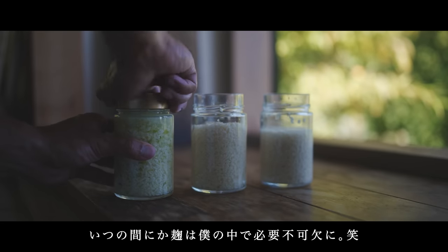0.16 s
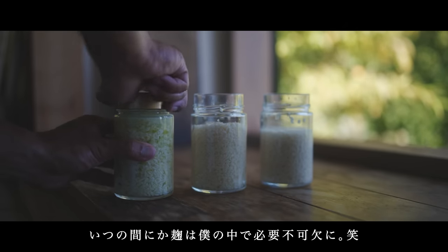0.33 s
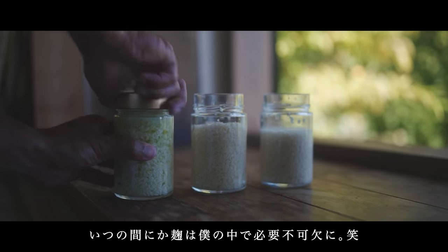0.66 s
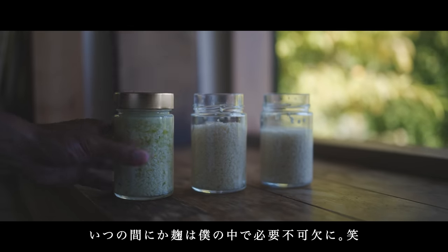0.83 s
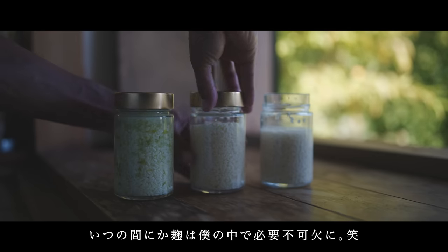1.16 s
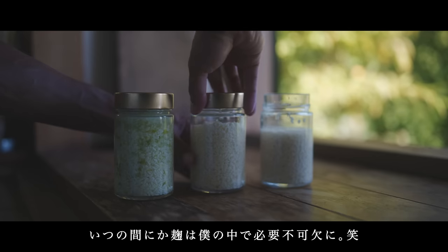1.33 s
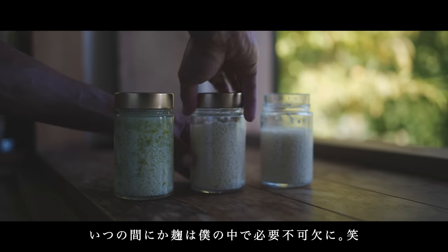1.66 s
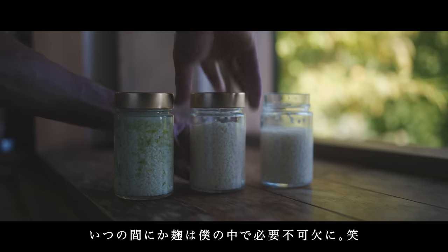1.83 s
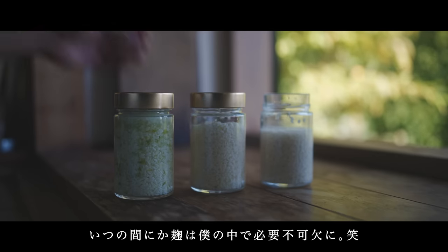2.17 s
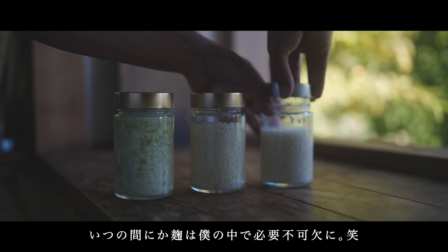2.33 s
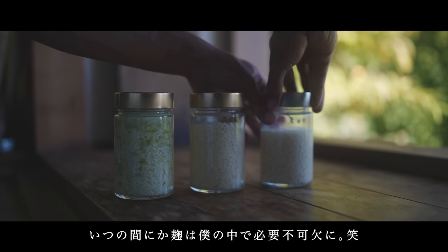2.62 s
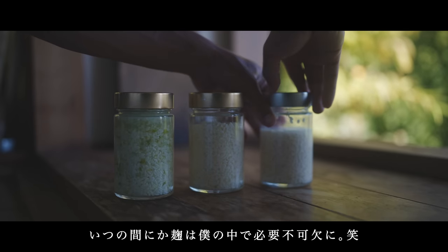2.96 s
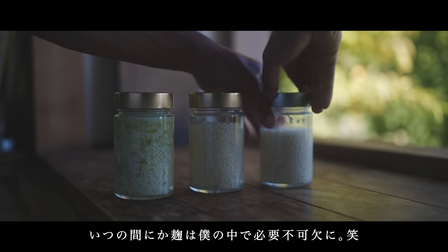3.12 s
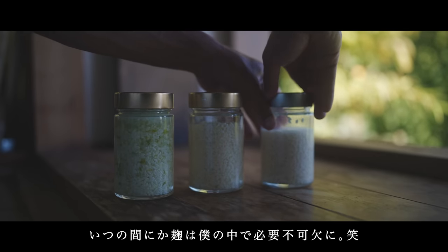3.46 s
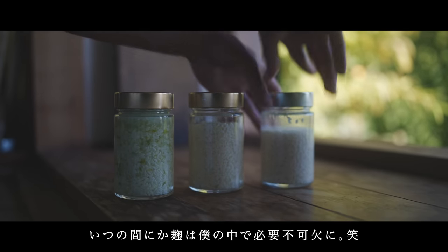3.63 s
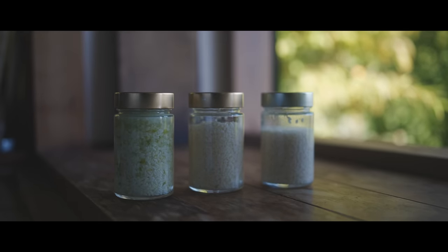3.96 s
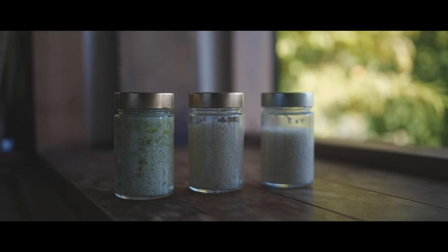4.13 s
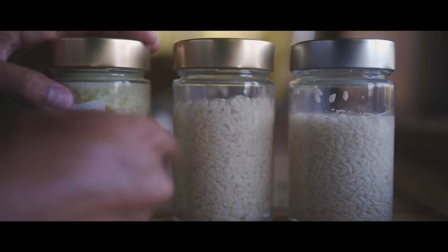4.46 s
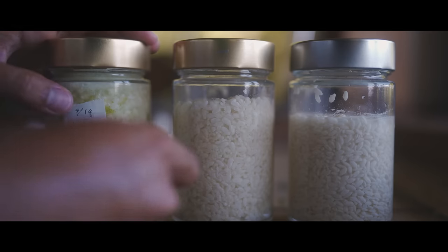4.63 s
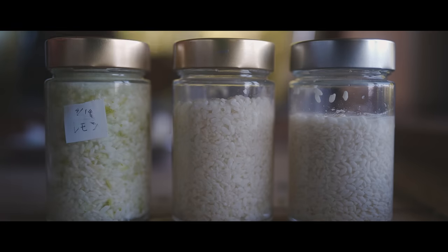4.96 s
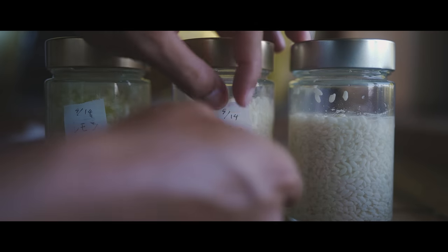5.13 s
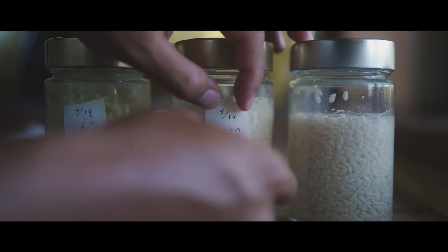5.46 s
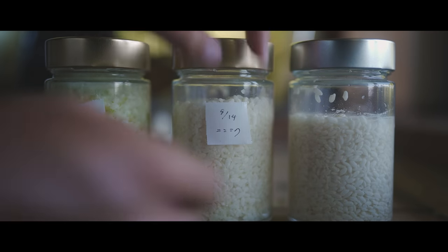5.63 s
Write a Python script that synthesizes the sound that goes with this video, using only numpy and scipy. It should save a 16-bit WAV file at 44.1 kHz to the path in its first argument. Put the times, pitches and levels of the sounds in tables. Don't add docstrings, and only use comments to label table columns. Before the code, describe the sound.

A close, dry sound of jars handled on a wooden table beside an open window, with quiet low rumble, soft hiss and small insect chirps behind. At about 0.4 s a lid and jar give a muted knock. From 0.95 to 1.3 s a metal lid lands on glass in a loud cluster of clacks, hollow drumming and bright ringing, then turns with light scrapes until about 1.9 s. At 2.3 to 2.7 s the last lid clatters on and tightens with coarse thread bites and wooden thumps. Softer settling taps follow at 2.9 to 3.6 s, and a low slide on wood near 3.9 s. A far chime tinkles faintly at 3.8, 4.2, 4.8 and 5.1 s. Around 4.5 s sticky label glue snaps sharply, followed by papery finger rubs to 4.8 s, a small tick at 4.9 s, and soft last strokes near 5.6 s.

```python
import sys
import numpy as np
from scipy import signal
from scipy.fft import rfft, irfft, next_fast_len
from scipy.io import wavfile
from scipy.ndimage import uniform_filter1d, map_coordinates

SR = 44100
rng = np.random.default_rng(int(sys.argv[2]) if len(sys.argv) > 2 else 0)


def undo_db(level):
    steps = np.asarray(level, float) / 20
    return 10 ** steps


def transcribe(signal):
    frames = np.atleast_2d(signal).T
    limited = np.clip(frames, -1, 1)
    pcm = np.round(limited * 32767).astype(np.int16)
    wavfile.write(sys.argv[1], SR, pcm)


N = 255339


def unit(x):
    return x / np.sqrt(np.mean(x ** 2) + 1e-20)


def along(points, hz):
    f, value = np.transpose(points)
    return np.interp(np.log(hz + 1), np.log(f + 1), value)


def level_curve(points):
    s, db = np.transpose(points)
    gain = undo_db(np.interp(np.arange(N) / SR, s, db, -140, -140))
    return uniform_filter1d(gain, size=200)


def wobble(rate):
    knots = rng.standard_normal(int(N * rate / SR) + 4)
    return map_coordinates(knots, [np.arange(N) * rate / SR])


def swell(start, peak, end):
    out = np.zeros(N)
    a, b = int(start * SR), int((max(end, peak, start) + .01) * SR)
    times = [start, max(peak, start + .002), max(end, peak + .004)]
    shape = np.interp(np.arange(a, min(b, N)) / SR, times, [0, 1, 0])
    out[a:b] = np.sin(np.pi / 2 * shape) ** 2
    return out


def add_at(out, s, sound):
    start = round(s * SR)
    out[..., start:start + sound.shape[-1]] += sound


def filtered(x, response):
    m = next_fast_len(len(x) + SR // 2)
    return irfft(rfft(x, m) * response(np.fft.rfftfreq(m, 1 / SR)), m)[:len(x)]


def banded(x, order, edges, kind):
    return signal.sosfilt(signal.butter(order, edges, kind, fs=SR, output="sos"), x)


def noise(spectrum):
    return unit(filtered(rng.standard_normal(N), lambda hz: undo_db(along(spectrum, hz))))


def grit(sharp_db):
    return rng.standard_normal(N) * undo_db(sharp_db * (wobble(400) + .8 * wobble(60)))


def body(modes):
    def response(f):
        total = 0
        for k, (centre, width, db) in enumerate(modes):
            loss = 1j * f * width
            total = total + (-1) ** k * undo_db(db) * loss / (centre ** 2 - f * f + loss)
        return total
    return response


def held(modes, blur):
    return body([(hz, blur / t60, db) for hz, db, t60 in modes])


def ring(modes, centre_hz, spread, scatter_db, attack, damp, rough, t):
    hz, db, t60 = np.transpose(modes)[:, :, None]
    luck = rng.standard_normal((3, len(modes), 1))
    steps = rng.standard_normal((len(modes), len(t) // 64 + 1))
    drift = np.cumsum(steps, axis=1).repeat(64, axis=1)[:, :len(t)]
    drift = uniform_filter1d(drift, size=128, axis=1)
    db = db + scatter_db * luck[0] - spread * np.abs(np.log2(hz / centre_hz))
    decay = undo_db(db - 60 * t / (damp * t60))
    flutter = 1 + rough * np.cos(1.85 * drift + 2 * luck[2])
    phase = 2 * np.pi * hz * (1 + 0.0043 * luck[1]) * t + 0.76 * rough * drift[::-1]
    x = np.sum(decay * flutter * np.sin(phase), axis=0)
    x = x * (1 - np.exp(-t / attack))
    return x / np.abs(x).max()


# t/s, level/dB
RUMBLE_LEVEL = [(0, -53.5), (4.45, -53.5), (5.79, -57.5)]
HISS_LEVEL = [(0, -53.5), (1.3, -55), (3.5, -60), (4.35, -56), (5.2, -58), (5.25, -62), (5.79, -60)]
# f/Hz, density/dB
RUMBLE_SPECTRUM = [(12, -35.5), (20, 0), (38, 1.5), (149, -2.5), (188, -4), (363, -6), (403, -6.5),
                   (482, -6.5), (1400, -21.5), (1820, -49.5), (3080, -120)]
HISS_SPECTRUM = [(530, -15.5), (900, -1.5), (1270, -1.5), (1820, -4), (1990, -5), (2300, -4.5),
                 (5390, -7.5), (15200, -23), (16500, -37.5)]


def air():
    rumble = undo_db(0.5 + 1.5 * wobble(4.9)) * noise(RUMBLE_SPECTRUM)
    hiss = undo_db(-3.5 + 0.97 * wobble(6.1)) * noise(HISS_SPECTRUM)
    return level_curve(RUMBLE_LEVEL) * rumble + level_curve(HISS_LEVEL) * hiss


# t/s, level/dB
FAR_TRILL = [(2.7, -85), (3.5, -76), (4.25, -71)]


def far_insect():
    trill = filtered(grit(1.5), body([(6900, 250, 0)]))
    return level_curve(FAR_TRILL) * unit(undo_db(2 * wobble(20)) * trill)


# list of t/s, peak level/dB, length/s
NEAR_CHIRPS = [
    ([.226, .512, .803, 1.344, 1.938, 2.233], -57.5, .035),
    ([2.944, 3.198, 3.49, 3.8, 4.035], -65.5, .05),
]
WING_TONES = [6350, 6890]


def near_insects():
    t, out = np.arange(N) / SR, np.zeros(N)
    for (times, db, length), hz in zip(NEAR_CHIRPS, WING_TONES):
        chirps = sum(swell(s, s + 0.55 * length, s + length) for s in times)
        out += undo_db(db) * chirps * np.sin(2 * np.pi * hz * t)
    return out * (1 + 0.19 * wobble(84))


# f/Hz, and t60/s
CHIME_MODES = [2670, 6980, 11950]
CHIME_DECAYS = [1.2, 0.4, .3]
# t/s, level/dB of each mode
CHIME_STRIKES = [
    (3.818, -63, -71, -70),
    (4.165, -65, -73, -69),
    (4.764, -61, -57, -74),
    (5.074, -59, -64, -63.5),
]


def chime():
    out, t = np.zeros(N + SR), np.arange(SR // 3)[:, None] / SR
    depth, beat_hz, phase = np.array([[.3, .5, .5], [9, 24, 24], [0, 1.2, 0]])
    beat = 1 - depth * np.cos(2 * np.pi * beat_hz * t + phase)
    rest_s = .12
    envelope = (1 - np.exp(-t / 0.0021)) / (1 + (t / rest_s) ** 8)
    for s, *db in CHIME_STRIKES:
        decay = undo_db(db - 60 * t / CHIME_DECAYS)
        tones = decay * beat * np.sin(2 * np.pi * t * CHIME_MODES) * envelope
        add_at(out, s, tones.sum(axis=1))
    return out[:N]


# f/Hz, density/dB
SKIN_SPECTRUM = [(410, -2.5), (700, 0), (922, 0.5), (1380, -3), (2240, -2.5), (3280, -7), (3740, -7.5),
                 (13700, -18.5), (16000, -32)]
# start t/s, peak t/s, end t/s, level/dB, tilt/dB per octave
RUBS = [
    (1.61, 1.642, 1.69, -48, 4.5),
    (3.215, 3.22, 3.37, -51.5, -3),
    (3.892, 3.892, 3.98, -51.5, -2.5),
    (4.193, 4.21, 4.22, -49, 1.5),
    (4.198, 4.275, 4.33, -53, 0.5),
    (4.505, 4.548, 4.53, -47.5, 2.5),
    (4.536, 4.652, 4.75, -51.5, 2),
    (4.688, 4.765, 4.81, -51.5, 1),
    (5.552, 5.57, 5.66, -53, 0.5),
    (5.571, 5.635, 5.69, -53, -1),
]


def rubbing():
    out, fine = np.zeros(N + SR), np.pad(grit(0.44), (0, SR), "wrap")
    span = SR // 4
    for start, peak, end, db, tilt_db in RUBS:
        skin = lambda hz: undo_db(along(SKIN_SPECTRUM, hz) + tilt_db * np.log2((hz + 100) / 3000))
        hiss = unit(filtered(fine[round(start * SR):][:span], skin))
        add_at(out, start, undo_db(db) * hiss * swell(0, peak - start, end - start)[:span])
    return out[:N]


# low f/Hz, high f/Hz
CRACK_BANDS = [(1050, 2600), (2700, 7000), (7000, 14800)]
# t/s, middle level/dB, high level/dB
GLUE_SNAPS = [
    (4.4674, -60, -48),
    (4.512, -66, -41),
    (4.521, -60, -29),
    (4.533, -43, -25.5),
    (4.539, -33, -13),
    (4.9133, -47, -56.5),
    (5.197, -58, -56.5),
]


def snaps():
    tracks, t = np.zeros((2, N + SR)), np.arange(SR // 50) / SR
    for s, mid_db, high_db in GLUE_SNAPS:
        click = undo_db(-60 * t / 0.0044) * (.5 * rng.standard_normal((2, len(t))) + 1.3 * (t == 0))
        add_at(tracks, s, undo_db([[mid_db + 11.5], [high_db]]) * click)
    middle = banded(tracks[0], 2, CRACK_BANDS[1], "band")
    high = banded(tracks[1], 2, CRACK_BANDS[2][0], "high")
    return (middle + high)[:N]


# f/Hz, width/Hz, level/dB
LAST_RIM_MODES = [(2310, 200, -4), (3820, 250, -6), (4430, 250, -3), (5100, 500, 0), (7110, 500, -8),
                  (9900, 700, -13)]
# start t/s, peak t/s, end t/s, level/dB
THREAD_BITES = [
    (2.592, 2.6, 2.615, -38.5),
    (2.603, 2.617, 2.63, -38.5),
    (2.645, 2.667, 2.7, -52),
    (2.44, 2.5, 2.51, -51),
]


def grinding():
    bite = sum(undo_db(db) * swell(*times) for *times, db in THREAD_BITES)
    return unit(filtered(grit(4.5), body(LAST_RIM_MODES))) * bite


# f/Hz, width/Hz, level/dB
RIM_MODES = [(3400, 120, 9), (4470, 730, 1), (5430, 270, -3.5), (6740, 510, -18), (7770, 240, 1.5),
             (9530, 830, -1), (11200, 990, -10.5), (12870, 450, -20), (14200, 900, -13)]
# f/Hz, level/dB, t60/s
DRUM_MODES = [(640.6, -5, 0.19), (722, -19, 0.044), (798, 2.5, 0.11), (902, -6.5, 0.087), (1034, -7.5, 0.1)]
# f/Hz, level/dB, t60/s
WOOD_MODES = [(107, 5.5, 0.16), (125.4, 4.5, 0.15), (148, 4.5, .2), (232, 4.5, 0.15), (335.2, 3.5, 0.18),
              (420, -1, 0.18), (445.4, 2, 0.18), (477, -8, 0.056)]
# start t/s, peak t/s, end t/s, rim scrape level/dB, lid drum level/dB
LID_TURNS = [(0.93, 1.006, 1.23, -69.5, -44.5), (1.175, 1.18, 1.403, -56.5, -39.5),
             (1.25, 1.285, 1.258, -47.5, -35.5), (1.58, 1.654, 1.705, -46, -64),
             (1.864, 1.87, 2.08, -60.5, -55.5), (2.31, 2.33, 2.7, -69, -44.5),
             (2.396, 2.418, 2.45, -52.5, -45), (2.43, 2.519, 2.535, -54, -40.5),
             (2.57, 2.593, 2.6, -58.5, -35.5), (2.584, 2.625, 2.632, -54, -29.5),
             (2.664, 2.656, 2.85, -64, -47.5)]
# start t/s, length/s, level/dB
JAR_SLIDES = [
    (1.874, 0.086, -45.5),
    (1.967, 0.13, -51),
    (2.401, 0.077, -40),
    (2.57, .04, -37),
    (3.874, 0.25, -38.5),
    (4.163, .09, -47),
]


def turning():
    rim = unit(filtered(grit(2.3), body(RIM_MODES)))
    drum = unit(filtered(grit(2.0), held(DRUM_MODES, 6)))
    wood = unit(filtered(rng.standard_normal(N), held(WOOD_MODES, 6)))
    turns = [undo_db(db)[:, None] * swell(start, peak, end) for start, peak, end, *db in LID_TURNS]
    scrape, press = sum(turns)
    slide = sum(undo_db(db) * swell(s, s + 0.23 * length, s + length) for s, length, db in JAR_SLIDES)
    table_share = undo_db(-13.5)
    return scrape * rim + press * drum + (table_share * press + slide) * wood


# t/s, peak level/dB, f/Hz, t60/s, spread of its modes/0-1
SPOT_PINGS = [(0.944, -38, 3000, .12, .05), (1.051, -27, 2177, .16, .005), (1.1237, -5, 800, .006, .1),
              (1.124, -22, 2500, .03, .15), (1.1266, -6, 1300, .007, .2), (1.129, -18, 1600, .07, .35),
              (1.1325, -8, 390, .075, .06), (1.159, -27, 2200, .08, .04), (1.176, -28, 2200, .07, .04),
              (1.159, -24, 3600, .03, .15), (2.318, -42, 2490, .2, .05), (2.325, -49, 3300, .2, .08),
              (2.372, -28, 2400, .04, .05), (2.37, -27, 3500, .04, .12), (2.381, -21, 3100, .03, .1),
              (2.382, -27, 1500, .05, .1), (2.4765, -42, 4500, .03, .05), (2.5155, -15, 800, .06, .01),
              (2.556, -22, 790, .07, .01), (2.641, -24, 4700, .02, .12), (2.687, -28, 790, .04, .01),
              (2.884, -28, 1200, .045, .1), (2.884, -36, 2455, .07, .01), (2.884, -40, 3250, .04, .03),
              (2.89, -31, 4700, .026, .1), (2.918, -50, 2400, .12, .01), (3.051, -44, 2500, .04, .04),
              (3.051, -41, 1300, .05, .15), (3.053, -60, 3600, .08, .04), (4.133, -48, 1800, .03, .06),
              (4.142, -50, 1507, .12, .04), (4.14, -45, 900, .1, .15), (4.197, -47, 1150, .04, .04),
              (4.307, -42, 2100, .03, .2), (4.314, -49, 3800, .02, .05), (4.308, -42, 250, .05, .1),
              (4.912, -54, 3400, .04, .06), (2.6022, -32, 5130, .015, .05), (2.6057, -30, 4820, .015, .05),
              (1.16, -20, 1500, .06, .25)]


def pings():
    out, t = np.zeros(N + SR), np.arange(SR // 8) / SR
    for s, db, hz, t60, spread in SPOT_PINGS:
        bunch = [(hz * (1 + spread * k), -3 * abs(k), t60) for k in (-1, -.4, 0, .6, 1)]
        add_at(out, s, undo_db(db) * ring(bunch, hz, 0, 0, .0003, 1, .5, t))
    return out[:N]


# t/s, peak level/dB, f/Hz
TABLE_KNOCKS = [(0.42, -22, 150.5), (0.49, -34, 98), (0.777, -33, 210), (0.807, -35.5, 231),
                (0.942, -34.5, 400), (1.054, -17.5, 422), (1.1245, -7, 420), (1.137, -14, 331.4),
                (1.175, -26, 338), (1.278, -26, 148), (1.317, -27.5, 143.5), (1.495, -33.5, 190),
                (1.859, -36, 107), (1.965, -39, 186), (1.999, -43, 247), (2.378, -21, 420),
                (2.511, -16.5, 523), (2.517, -8, 175.6), (2.552, -19.5, 238.3), (2.631, -19.5, 477),
                (2.883, -26.5, 404.5), (3.051, -33.5, 400), (3.132, -26, 138.8), (3.655, -31.5, 148),
                (4.132, -23.5, 460), (4.15, -29, 473), (4.195, -35, 456), (4.304, -41.5, 204),
                (4.536, -39, 410), (5.197, -42, 126.5)]


def knocks():
    out, t = np.zeros(N + SR), np.arange(SR // 4) / SR
    for s, db, hz in TABLE_KNOCKS:
        modes = WOOD_MODES + [(hz, 6, .17)]
        add_at(out, s, undo_db(db) * ring(modes, hz, 5.9, 2.5, 0.0016, 0.79, 0.34, t))
    return out[:N]


def crackle(t):
    fast_s, slow_s = np.array([[.03], [.015], [.011]]), np.array([[.12], [.12], [.1]])
    fade = undo_db(-60 * t / fast_s) + undo_db(-27.5 - 60 * t / slow_s)
    impulse = np.array([[-5], [-2.5], [-1.5]]) * (t == 0)
    return fade * (rng.standard_normal((3, len(t))) + impulse)


def through_rim(cracks):
    out = 0
    for crack, edges, db, share in zip(cracks, CRACK_BANDS, [5.5, -3, -3.5], [0, 1.8, 2.8]):
        rim = lambda hz: 1 + share * body(RIM_MODES[1:])(hz)
        out = out + undo_db(db) * filtered(banded(crack, 4, edges, "band"), rim)
    return out


# t/s, peak level/dB, f/Hz
LID_BLOWS = [(0.42, -29, 882), (0.942, -17, 678), (1.049, -34, 890), (1.057, -5, 895), (1.124, -13, 563),
             (1.128, -13, 1055), (1.158, -4, 790), (1.168, -33, 799), (1.177, -7, 757), (1.268, -31, 720),
             (1.282, -21, 803), (1.488, -39.5, 815), (2.319, -21.5, 847), (2.3645, -19, 900),
             (2.371, -12.5, 813), (2.38, -13, 803), (2.395, -13.5, 765), (2.5015, -15, 800),
             (2.51, -7.5, 765), (2.555, -17, 783), (2.633, -11.5, 760), (2.641, -17, 840),
             (2.682, -23, 780), (2.8835, -19, 870), (2.889, -26, 700), (3.051, -23.5, 811),
             (3.134, -33.5, 861), (3.569, -39, 638), (4.135, -35, 736)]


def blows():
    out, cracks, t = np.zeros(N + SR), np.zeros((3, N + SR)), np.arange(SR // 4) / SR
    for s, db, hz in LID_BLOWS:
        add_at(cracks[0], s, undo_db(db - 17) * crackle(t)[0])
        modes = DRUM_MODES + [(hz, 4, .09)]
        add_at(out, s, undo_db(db) * ring(modes, hz, 14, 2.5, .0005, 0.56, 0.52, t))
    return (out + through_rim(cracks))[:N]


HANDLED_FROM = [0, .9, 1.04, 1.14, 1.8, 2.3, 2.6, 2.8]
# f/Hz, level/dB, t60/s
JAR_RINGS = [
    [(2316, 6, .06), (3280, -4, 0.17), (4770, -6.5, 0.047)],
    [(1320, 2, 0.11), (2250, -6, 0.1), (2840, -5.5, 0.11), (5100, -20, 0.08), (6400, -17.5, .15),
     (8533, -16.5, 0.14), (11700, -18, .25)],
    [(2177, 7, 0.15), (4170, -13, 0.11), (7500, -10, 0.1), (9620, -2, 0.15)],
    [(1300, -1.5, 0.16), (2125, -5, 0.18), (3680, -8, 0.08), (4600, 1.5, .1), (5340, -9.5, .2),
     (8000, -10.5, 0.2), (9450, -8, 0.12), (10410, -12.5, .15)],
    [(3460, 18, 0.033), (4740, -5, .07), (5850, -10, .1), (7900, 7, 0.092), (9600, -6, 0.08),
     (11500, -6, .08)],
    [(2570, 3.5, .12), (3300, 1.5, 0.11), (4600, -2.5, 0.14), (6760, -7, .12), (9500, -6, 0.2),
     (12700, -16, .2)],
    [(2320, -9, 0.12), (4290, 8, 0.043), (5340, 8, 0.054), (9400, -11, 0.14)],
    [(1435, 10, 0.12), (3600, 8, 0.079), (4700, -2, 0.079)],
]
AFTER_RING = [-10.5, 5.5, -9.5, -4.5, -5, -22, -6.5, -5.5]
DULL_CRACK = [-2.5, 4, -17, -2, -10, -17, -40, -3]
# t/s, middle level/dB, high level/dB, brightest f/Hz
RIM_TOUCHES = [(0.4204, -22, -38, 4460), (0.9443, -29.5, -35, 2970), (1.0499, -9.5, -22, 3910),
               (1.0561, -16, -14, 4400), (1.127, -36.5, -49, 2290), (1.148, -28, -35, 4800),
               (1.1578, -14, -17, 5250), (1.1689, -18, -14, 7790), (1.176, -22, -19, 4250),
               (1.2621, -44, -55, 4000), (1.2814, -24.5, -22, 4340), (1.488, -36.5, -40.5, 3680),
               (1.783, -48, -46.5, 6100), (1.876, -59, -47, 3840), (1.8933, -27.5, -26, 6200),
               (1.905, -56, -50, 6400), (1.9275, -60, -45, 9700), (1.969, -42, -49, 3930),
               (2.3175, -41, -48, 2570), (2.3647, -31, -48, 3540), (2.371, -19.5, -30, 2410),
            (2.3815, -8, -13.5, 9300), (2.3953, -27.5, -27.5, 3900), (2.5042, -30, -35, 4370),
            (2.5109, -19, -29, 4390), (2.555, -33, -40, 2460), (2.5799, -43, -54, 4540),
            (2.6327, -17.5, -41, 4360), (2.6416, -24, -32, 5100), (2.6818, -37, -50, 2430),
            (2.8828, -37, -42.5, 2420), (2.8895, -34, -46, 4000), (2.9356, -50, -68, 4650),
            (3.052, -40, -62, 2550), (3.1332, -40, -58, 2410), (3.1615, -45, -45, 3950),
            (3.569, -44.5, -48, 5650), (3.646, -45, -73, 3500), (3.894, -41.5, -67, 2500),
            (4.134, -46, -66, 1540), (4.2064, -50, -41, 3440), (4.3075, -43, -43.5, 2370),
            (4.3482, -54, -67, 4480)]


def rim_touches():
    out, cracks, t = np.zeros(N + SR), np.zeros((3, N + SR)), np.arange(SR // 4) / SR
    for s, mid_db, high_db, hz in RIM_TOUCHES:
        jar = np.searchsorted(HANDLED_FROM, s) - 1
        levels = undo_db([mid_db + DULL_CRACK[jar], mid_db, high_db])
        add_at(cracks, s, levels[:, None] * crackle(t))
        bright_level = levels[np.searchsorted([2800, 7000], hz)]
        brightest = bright_level * ring([(hz, 0, .02)], hz, 0, 0, 0.00029, 0.71, 0.13, t)
        linger = ring(JAR_RINGS[jar], hz, 0.58, 0.5, 0.00057, 0.63, 0.79, t)
        linger_level = levels[1:].max() * undo_db(AFTER_RING[jar])
        add_at(out, s, undo_db(-2.0) * brightest + linger_level * linger)
    return (out + through_rim(cracks))[:N]


# f/Hz, t60/s
ROOM_DECAY = [(150, 0.287), (1000, 0.17), (5000, 0.12), (14000, 0.042)]


def room(x):
    out, step = np.zeros(N + SR), SR // 5
    for start in range(0, N, step):
        hz, t, z = signal.stft(rng.standard_normal(SR // 3), SR, nperseg=256)
        decay = undo_db(-60 * t / along(ROOM_DECAY, hz)[:, None])
        tail = signal.istft(z * decay, SR, nperseg=256)[1]
        wet = signal.fftconvolve(x[start:start + step], tail / np.linalg.norm(tail))
        out[start + 200:][:len(wet)] += wet
    return out[:N]


def scene():
    jars = filtered(knocks() + blows() + rim_touches(), lambda hz: (1j * hz / (60 + 1j * hz)) ** 2)
    outside = air() + far_insect() + near_insects() + chime()
    hands = rubbing() + snaps() + grinding() + turning() + pings()
    return (outside + hands + jars + undo_db(-16) * room(jars))[None]


def band_limit(x):
    return signal.sosfilt(signal.butter(12, 16860, fs=SR, output="sos"), x)


def record(dry):
    colour = lambda hz: (1j * hz / (50 + 1j * hz)) ** 3 * np.where(hz < 15900, 1, undo_db(-14.5))
    x = filtered(dry[0], colour)
    ceiling = .98
    mix = x / (1 + np.abs(x / ceiling) ** 12) ** (1 / 12)
    return band_limit(mix[None])


dry = scene()
out = record(dry)
transcribe(out)
```